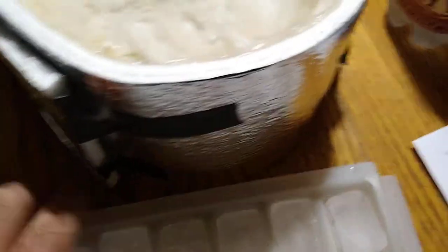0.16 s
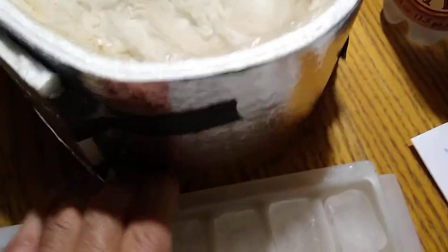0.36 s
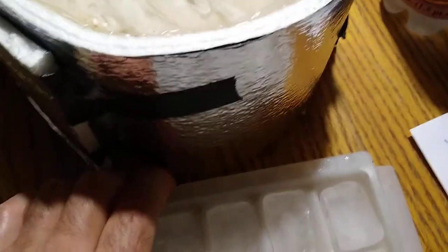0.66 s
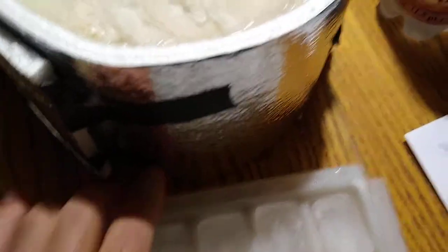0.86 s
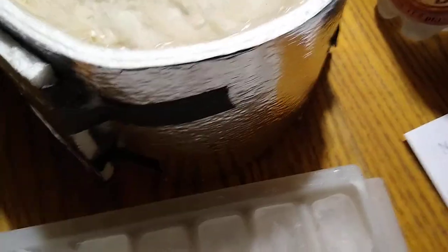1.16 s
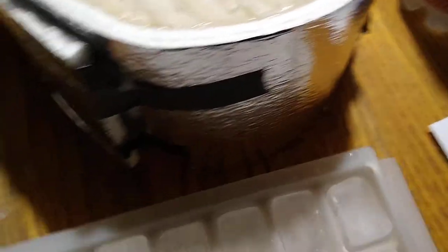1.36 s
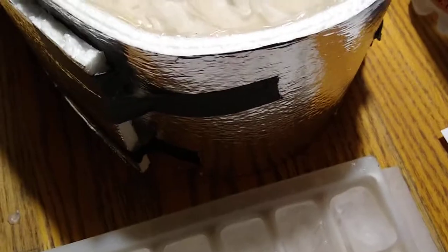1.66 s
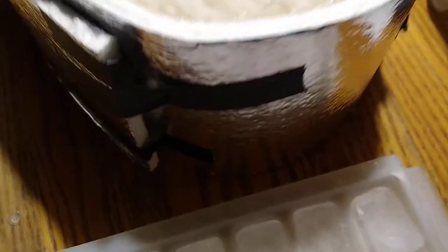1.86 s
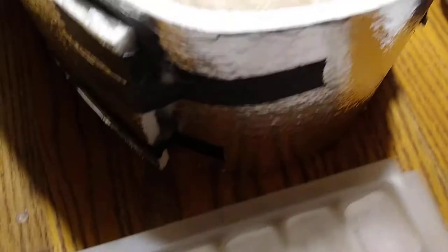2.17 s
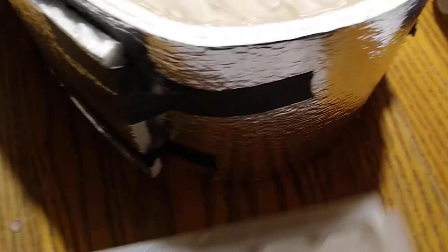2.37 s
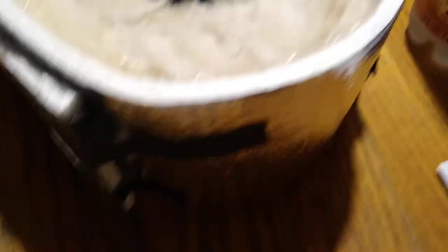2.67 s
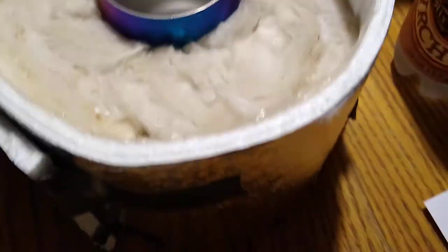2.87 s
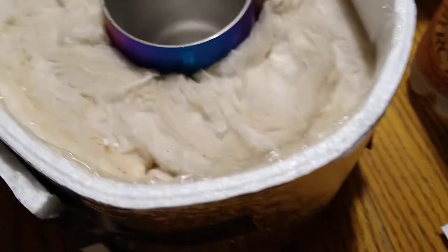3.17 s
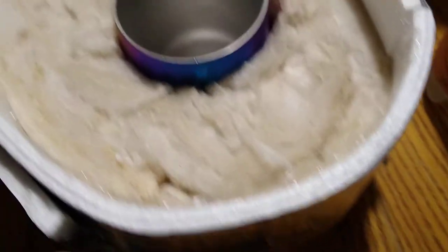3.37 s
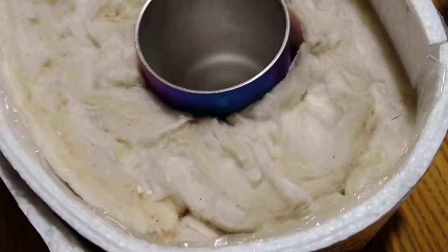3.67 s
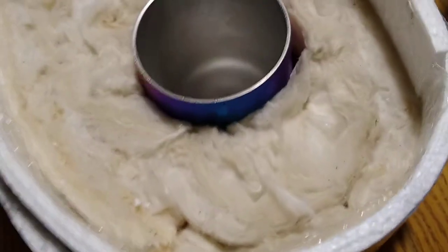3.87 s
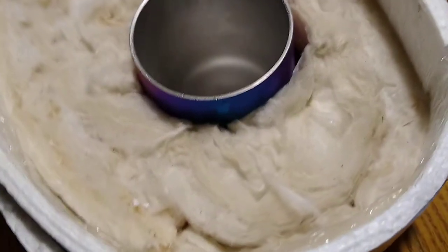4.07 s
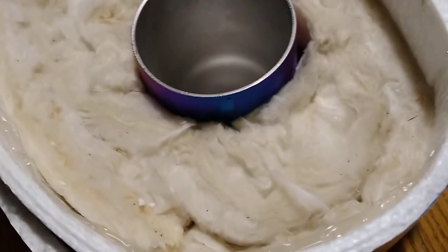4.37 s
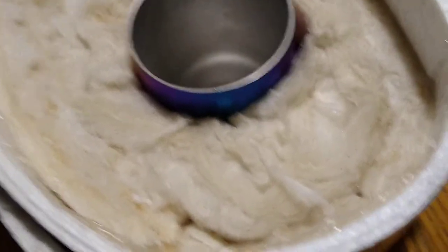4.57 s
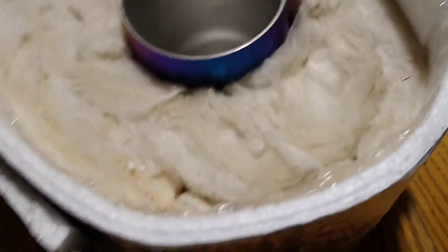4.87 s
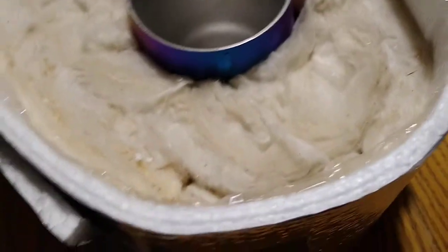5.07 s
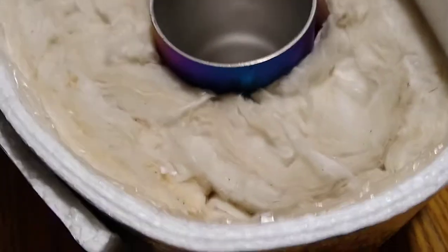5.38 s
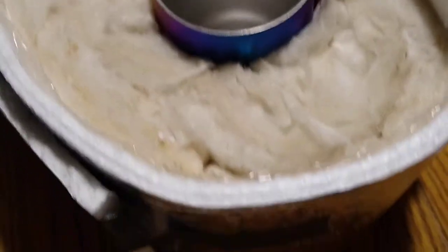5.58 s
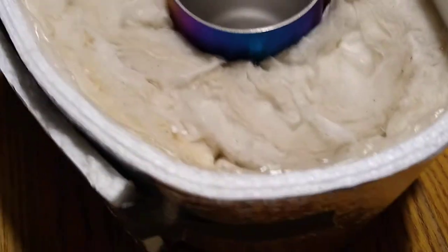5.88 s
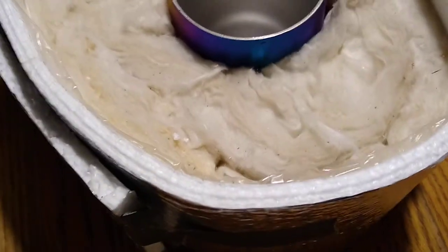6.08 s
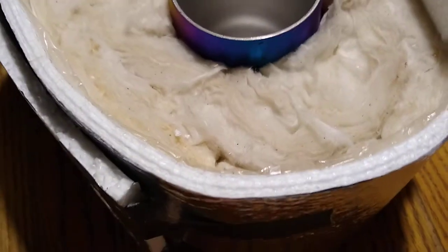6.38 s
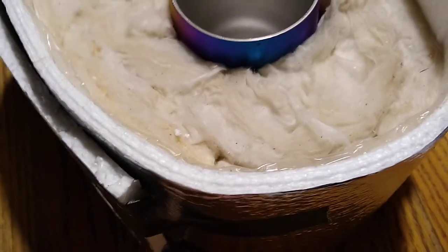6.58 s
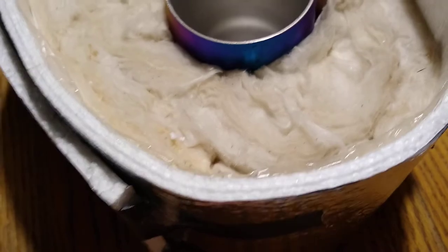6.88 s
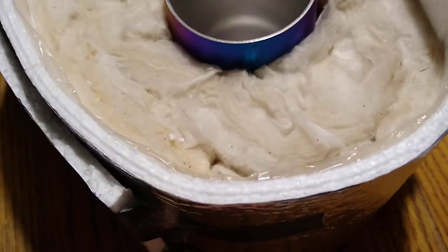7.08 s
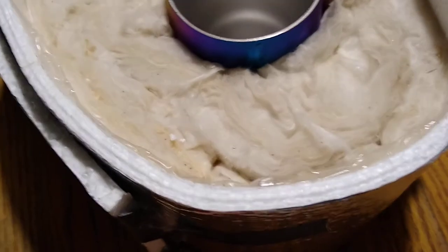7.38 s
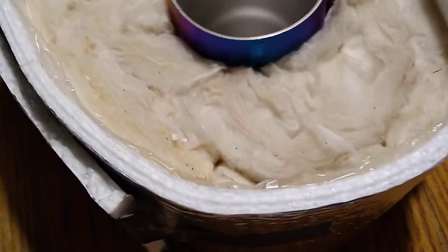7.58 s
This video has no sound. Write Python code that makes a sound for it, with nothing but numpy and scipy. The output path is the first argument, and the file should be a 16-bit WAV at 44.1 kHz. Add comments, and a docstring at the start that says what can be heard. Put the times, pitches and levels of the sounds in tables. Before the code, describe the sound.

Hand-held stereo microphones sit close to a tray of ice. Early knocks, finger rubs and a short crackle give way to near quiet, then a dragging rattle on wood. A heavy run of brittle cracks and bright snaps comes next, ending in clacks of loosened cubes. Later come isolated dull taps, soft hand rubbing and one final short creaking crackle, in a dry small room with faint low hush.

```python
"""A plastic ice cube tray, close to the two microphone ports of a hand-held camera: under strain its ice
cracks loose, each crack a snap amid tiny slips that set filtered, quickly dying noise ringing.
The tray knocks hollowly on a wooden table whose top booms, and loosened cubes clack in their cups.
Random ticks over smooth noise make the crackle of the twists, the drag, the fingers and the hands.
Behind it lie the faint answer of a small, quiet room and a steady hush of coloured noise."""
import sys
import numpy as np
from scipy import signal
from scipy.fft import rfft, irfft, next_fast_len
from scipy.io import wavfile

SR = 44100
rng = np.random.default_rng(int(sys.argv[2]) if len(sys.argv) > 2 else 0)


def store_pcm(level_fs):
    """Save levels as 16-bit WAV."""
    pcm = np.round(np.clip(level_fs, -1, 1) * 32767).astype(np.int16)
    wavfile.write(sys.argv[1], SR, np.atleast_2d(pcm).T)


N = 340442


def amp(db):
    """Decibels to gain."""
    return 10 ** (np.asarray(db) / 20)


def unit(x):
    """Scales to rms 1."""
    return x / np.sqrt(np.mean(x ** 2) + 1e-20)


def read(points, hz):
    """Reads a table on a logarithmic frequency axis."""
    f, value = np.transpose(points)
    return np.interp(np.log(hz + 1), np.log(f + 1), value)


def add(track, s, sound):
    """Mixes a sound into a two-channel track at time s."""
    part = track[:, max(round(s * SR), 0):][:, :sound.shape[1]]
    part += sound[:, :part.shape[1]]


def shaped(x, response):
    """Filters x by a gain given as a function of frequency."""
    size = next_fast_len(N + 8192)
    spectrum = rfft(x, size) * response(np.fft.rfftfreq(size, 1 / SR))
    return irfft(spectrum, size)[..., :N]


def coloured(x, colour):
    """Gives x a spectrum, at rms 1."""
    return unit(shaped(x, lambda hz: amp(read(colour, hz))))


def level(curve):
    """A dB curve as a gain on every sample, silent outside its span."""
    s, db = np.transpose(curve)
    return amp(np.interp(np.arange(N) / SR, s, db, left=-200, right=-200))


def swells(strokes, depth_db):
    """Each stroke grows by depth_db to its peak and dies away again."""
    total = 0
    for start, peak, end, db in strokes:
        edge_db = db - depth_db
        total = total + level([(start - .02, -120), (start, edge_db), (peak, db),
                               (end, edge_db), (end + .02, -120)])
    return total


def lift(hz, width, db):
    """A filter section that raises one resonance, or dips where db is negative."""
    damp, turn = np.pi * width / SR, -2 * np.cos(2 * np.pi * hz / SR)
    return np.array([[1 + damp * amp(db), turn, 1 - damp * amp(db), 1 + damp, turn, 1 - damp]]) / (1 + damp)


def spot(hz, width_hz=260, ring_db=8):
    """Every spot has its own ring, and two bright overtones that fall by chance."""
    overtones = [lift(f, 220, 7) for f in rng.uniform([2900, 3500], [3800, 6200])]
    return np.vstack([lift(hz, width_hz, ring_db)] + overtones)


# spectrum of the hush of the house: (frequency [Hz], density [dB per Hz, relative])
HUSH_COLOUR = [(25, -29.5), (105, -13.5), (170, -9.5), (206, -3.5), (245, -8.5), (450, -14.5), (1050, -14),
               (1550, -25.5), (2200, -33), (3400, -23), (4500, -35), (9000, -45), (16000, -38)]


def hush(level_db=-64.7, apart=0.93):
    """Quiet hush of the house: steady noise, partly shared by the ports and partly different."""
    shared = rng.standard_normal(N)
    return amp(level_db) * coloured(shared + apart * rng.standard_normal((2, N)), HUSH_COLOUR)


# the small room: (frequency [Hz], decay t60 [s], level [dB])
ROOM = [(100, 0.24, -8.5), (300, 0.14, -15), (1000, 0.42, -21.5), (3500, 0.24, -17.5), (7900, 0.16, -11.5),
        (14800, .26, -10.5)]


def room(x, dense_s=.05, late_db=-8):
    """Dense echoes that drop quickly after about 50 ms to a weaker tail, different at each port."""
    hz, t, echoes = signal.stft(rng.standard_normal((2, SR // 2)), SR, nperseg=256)
    table = np.array(ROOM)
    t60 = read(table[:, :2], hz)[:, None]
    db = read(table[:, ::2], hz)[:, None]
    echoes *= amp(db - 60 * t / t60)
    echoes *= np.sqrt(2 * np.log(1000) / (t60 * SR))  # equal energy whatever the decay
    echoes *= np.clip(t / 0.0025, 0, 1)  # nothing in the frame at time zero
    echoes *= amp(late_db * np.clip((t - dense_s) / .03, 0, 1))
    return signal.fftconvolve(x, signal.istft(echoes, SR, nperseg=256)[1], axes=1)[:, :N]


# the two microphone ports: (frequency [Hz], phase by which left leads [radians])
PORT_PHASE = [(100, -.7), (600, -.4), (1550, .2), (1850, 3), (2200, 3), (4350, -3.1), (4800, -3.5),
              (5400, -6.1), (6100, -6.9), (6500, -9.5), (8800, -16), (10400, -13.4), (15400, 0)]


def ports(x):
    """Sound bends round the camera and reaches its two ports at different phases."""
    halves = np.array([[.5j], [-.5j]])
    return shaped(x, lambda hz: np.exp(halves * np.interp(hz, *np.transpose(PORT_PHASE))))


# the two microphone ports: (frequency [Hz], left minus right [dB])
PORT_BALANCE = [(120, 5.5), (300, 3), (700, 1.5), (1700, -0.5), (2600, 1.5), (3900, -2.5), (6500, 2),
                (9500, 9), (12000, 11), (15500, 5)]


def balance(hz):
    """Gains of the two ports, at constant total power."""
    gains = amp(np.array([[.5], [-.5]]) * read(PORT_BALANCE, hz))
    return gains / np.sqrt(np.mean(gains ** 2, axis=0))


def friction(colour, slips_per_s, spread_db, smooth, count=4):
    """Stick and slip: random ticks of uneven size at several ringing spots, over a smooth hiss."""
    sizes = amp(spread_db * np.minimum(rng.exponential(size=N), 3)) * rng.choice([-1, 1], N)
    ticks = sizes * (rng.random(N) < slips_per_s / SR)
    where = rng.integers(count, size=N)
    rung = 0
    for k in range(count):
        rung = rung + signal.sosfilt(spot(rng.uniform(500, 1500)), ticks * (where == k) + 1e-18)
    return coloured(unit(rung) + smooth * rng.standard_normal(N), colour)


# spectrum of the rubbing hands: (frequency [Hz], density [dB per Hz, relative])
RUB_COLOUR = [(59, -37), (100, -12.5), (135, -2.5), (691, -12), (930, -10), (2080, -18.5), (3320, -16.5),
              (16000, -52)]
# soft rubs of the hands: (start [s], peak [s], end [s], level before the trim [dB])
RUBS = [(-.3, .5, 1.25, -57), (1.42, 1.53, 1.59, -55), (2.8, 3.5, 7.6, -60.5), (5.38, 5.52, 5.68, -58.5),
        (5.6, 5.75, 6.35, -62.5), (6.6, 7.3, 8, -59)]


def hand_rubs(trim_db=-1):
    """Soft rubs of the hands: sparse slips under as much smooth hiss."""
    rub = friction(RUB_COLOUR, slips_per_s=140, spread_db=3.5, smooth=1.0)
    return amp(trim_db) * rub * swells(RUBS, depth_db=16.5)


# spectrum of plastic on wood: (frequency [Hz], density [dB per Hz, relative])
DRAG_COLOUR = [(55, -60), (100, -21), (300, -13.5), (420, 0.5), (600, -5.5), (1300, -19), (2220, -26),
               (3600, -18.5), (4400, -20.5), (5800, -40), (7500, -45.5), (13200, -36), (16000, -45)]
# the tray dragging over the table: (time [s], level before the trim [dB])
DRAG = [(2.5, -55), (2.55, -47.5), (2.575, -37), (2.63, -42.5), (2.7, -35), (2.785, -34), (2.83, -46.5),
        (2.89, -41), (2.94, -61)]


def tray_drag(trim_db=-2):
    """The tray drags over the wood in dense slips."""
    drag = friction(DRAG_COLOUR, slips_per_s=650, spread_db=4, smooth=.25)
    return amp(trim_db) * drag * level(DRAG)


# spectrum of the rubbed or strained plastic: (frequency [Hz], density [dB per Hz, relative])
PLASTIC_COLOUR = [(88, -31), (150, -2.5), (270, 0.5), (504, -15), (1420, -18), (2180, -22), (3100, -14.5),
                  (4000, -11.5), (4410, -15.5), (5250, -16.5), (8400, -25.5), (15100, -17), (16000, -21.5)]
# strokes along the frosty plastic: (start [s], peak [s], end [s], level [dB])
# two rows end before they start; their points are interpolated unsorted
SLIDES = [(-.02, .012, 0.07, -43.5), (.4, .46, .6, -45), (.6, .66, 0.49, -44), (3.36, 3.4, 3.44, -44),
          (7.1, 7.14, 7.2, -50.5), (7.19, 7.28, 7.06, -33)]


def finger_slides():
    """Fingers slide along the frosty plastic in very dense, uneven slips."""
    slide = friction(PLASTIC_COLOUR, slips_per_s=900, spread_db=5.5, smooth=.25)
    return slide * swells(SLIDES, depth_db=20)


# each twist strains the tray and lets go: (start [s], peak [s], end [s], level before the trim [dB])
TWISTS = [(0.596, 0.663, 0.81, -42.5), (3.327, 3.55, 3.58, -51.5), (3.626, 3.752, 3.94, -39.5),
          (3.914, 4.142, 4.15, -48.5), (4.223, 4.355, 4.5, -54), (4.489, 4.625, 4.69, -46),
          (7.03, 7.236, 7.39, -46.5)]


def strain_crackle(trim_db=-1):
    """Fine crackle of the strained tray: sparse slips that swell with each twist."""
    strain = friction(PLASTIC_COLOUR, slips_per_s=140, spread_db=1.5, smooth=.15)
    return amp(trim_db) * strain * swells(TWISTS, depth_db=23.5)


# resonances of tray and table, and dips in the sound as picked up:
# (frequency [Hz], width [Hz], lift [dB])
MODES_AND_DIPS = [(143.2, 35, 11.5), (314.9, 34, 5.5), (490, 43, 2), (1120, 280, 3), (2216, 490, -13),
                  (3670, 320, 1), (5720, 1400, 5), (8130, 7100, -6.5)]


def tray_filter(low_hz, high_hz):
    """One register of the tray, with the resonances and dips in and next to it."""
    band = signal.butter(2, [low_hz, min(high_hz, .45 * SR)], "band", fs=SR, output="sos")
    skirt_hz = [.6 * low_hz, min(1.15 * high_hz, .47 * SR)]
    skirt = signal.butter(2, skirt_hz, "band", fs=SR, output="sos")
    modes = [lift(*mode) for mode in MODES_AND_DIPS if low_hz / 2 < mode[0] < high_hz * 2]
    return np.vstack([band, skirt] + modes)


# registers of the tray, thump to fizz: (low edge [Hz], high edge [Hz], ring t60 [s],
# ring against the first pulse, before ring_db [dB], span of the blow [s],
# ring that differs between the ports [ratio to the shared noise])
REGISTERS = [(120, 343, 0.19, -1, .035, 0.89), (270.6, 794, 0.09, 2.5, 0.028, 0.12),
             (720, 2345, 0.054, -0.5, 0.0095, 3.6), (2220, 4590, 0.039, 0, 0.036, 0.68),
             (6700, 18000, 0.012, 3, .012, 5.3)]


def strike(force, levels_db, ring_hz, filters, lead_s, ring_db):
    """A force sets each register going: a first pulse, then a dense, quickly dying ring from all over the tray."""
    t = np.arange(SR // 8) / SR
    out, own = np.zeros((2, len(t))), spot(ring_hz)
    for (_, _, t60, share_db, span, apart), sos, db in zip(REGISTERS, filters, levels_db):
        ring = rng.standard_normal(len(t)) + apart * rng.standard_normal((2, len(t)))
        ring *= amp(-60 * t / t60)
        ring *= amp(share_db + ring_db) / np.linalg.norm(ring[0])
        ring[:, 0] += 1  # the first pulse
        driven = signal.fftconvolve(force[None], ring, axes=1)[:, :len(t)]
        wave = signal.sosfilt(np.vstack([sos, own]), driven + 1e-18)
        # a level is the energy of the blow, spread over a hundredth of a second
        blow = np.linalg.norm(wave[:, :int((lead_s + span) * SR)])
        out += amp(db) * wave * np.sqrt(2 * SR / 100) / blow
    return out


def blow_force(lead, lead_in_db=-27, lead_in_s=0.0039):
    """The force of a blow: a few milliseconds of faint noise lead in to the full pulse."""
    force = rng.standard_normal(lead + 1) * np.exp(np.arange(-lead, 1) / (lead_in_s * SR))
    force *= amp(lead_in_db) / np.linalg.norm(force)
    force[lead] = 1
    return force


def boom(db, mode_hz=143.8, t60=.11, rise_s=0.01, boom_db=6, waver=0.034):
    """The lowest mode of the table top builds up over a cycle or two and dies away."""
    t = np.arange(SR // 4) / SR
    hz = mode_hz * (1 + waver * rng.uniform(-1.1, 1))
    wave = np.sin(2 * np.pi * hz * t) * (1 - np.exp(-t / rise_s))
    return np.ones((2, 1)) * wave * amp(db + boom_db - 60 * t / t60)


# the tray knocks on the table: (time [s], strength [dB], weight of the thump [dB],
# hardness of the contact [dB], ring of the struck spot [Hz])
KNOCKS = [(.167, -23, -13.5, -23.5, 596), (0.2127, -26.5, -3, -30, 720), (0.2255, -27, -33, -12.5, 396),
          (.236, -27.5, -3, -7, 640), (.243, -30, -9, -9.5, 1000), (0.6806, -22.5, -15.5, -17.5, 1130),
          (1.0093, -22.5, -23, -29, 1040), (1.0219, -26, -13, -20, 730), (1.033, -25, -10, -2.5, 1100),
          (1.4462, -39.5, -7, -10, 760), (1.9347, -49.5, -21, -13, 1040), (2.142, -40.5, -13, -23.5, 476),
          (2.507, -42.5, -11, -9.5, 640), (2.694, -30.5, -28, -29, 497), (2.7769, -32.5, -24, -20.5, 517),
          (2.7943, -34, -2, -28, 510), (2.89, -32.5, -5.5, -36, 504), (2.907, -35.5, 0.5, -43, 601),
          (3.0746, -46, -7.5, -7.5, 1050), (3.1789, -47, -3, -13, 1000), (3.3551, -38.5, 2, -2.5, 865),
          (4.651, -40.5, -2, -26, 657), (4.8202, -34.5, -0.5, -15, 315.4), (5.487, -38.5, -0.5, -20, 700),
          (5.5713, -25, -13, -13, 720), (6.0425, -32, 2.5, -12.5, 950), (6.626, -36, -21, -34.5, 1170),
          (6.6367, -42, -8, -3.5, 1254), (6.6852, -34.5, -3.5, -10.5, 800), (6.933, -39, -2, -23.5, 409),
          (7.3172, -30, -7.5, -7.5, 1460), (7.4674, -51.5, -18, -19, 1210), (7.5801, -31.5, -6, -21.5, 500),
          (7.6997, -29.5, -3, -7.5, 600)]


def knocks(filters, even_hz=950, hollow_db_per_octave=-10, fizz_db=-10):
    """Blunt blows of the tray on the table: the lower a spot rings, the hollower it sounds."""
    out, lead = np.zeros((2, N)), SR // 100
    for s, db, weight_db, hard_db, hz in KNOCKS:
        hollow_db = hollow_db_per_octave * np.log2(hz / even_hz)
        # hollow and body registers share the strength of the blow
        body_db = db - 10 * np.log10(1 + amp(hollow_db) ** 2)
        levels_db = [db + weight_db, body_db + hollow_db, body_db, db + hard_db, db + hard_db + fizz_db]
        blow = strike(blow_force(lead), levels_db, hz, filters, lead / SR, ring_db=-1)
        add(out, s - lead / SR, blow)
        add(out, s, boom(db + weight_db))
    return out


# loosened cubes clack back into their cups: (time [s], strength [dB], ring of the cup [Hz])
CLACKS = [(4.088, -20, 792), (4.123, -15.5, 899), (4.1672, -30.5, 810), (4.1762, -24, 827),
          (4.182, -31, 840.5)]
# what a cube puts into each register, thump to fizz: (level against its strength [dB])
CLACK_DB = [-21, -14, 0.5, -10, -23]


def clacks(filters, ring_db=-1):
    """A cube drops back and rings its cup."""
    out = np.zeros((2, N))
    for s, db, hz in CLACKS:
        add(out, s, strike(np.ones(1), db + np.array(CLACK_DB), hz, filters, 0, ring_db))
    return out


def cup_filters(filters, hz, lowest=0.68):
    """The middle register of a cracking cup holds little below the cup's own ring."""
    cut = signal.butter(3, min(lowest, 1) * hz, "high", fs=SR, output="sos")
    return filters[:2] + [np.vstack([filters[2], cut])] + filters[3:]


def crack_levels(db, bright_db, hz, hollow_db=-8, hollow_db_per_octave=-9, thump_db=-11,
                 fizz_db=-13, fizz_growth=.82, fizz_per_bright=0.25):
    """Levels of the registers: a low-ringing cup moves more of the tray; small, bright cracks hold more fizz."""
    body_db = db - bright_db
    low_db = body_db + hollow_db + hollow_db_per_octave * np.log2(hz / 900)
    top_db = fizz_db + fizz_growth * db + fizz_per_bright * bright_db
    return [low_db + thump_db, low_db, body_db, db, top_db]


def small_cracks(above_db=-1, spread_db=3, bright_db=9, scatter_s=.0012, count=3):
    """Every twist sets off a few faint cracks, most likely near its peak."""
    faint = []
    for start, peak, end, db in TWISTS:
        for _ in range(count):
            s = rng.triangular(*sorted([start, peak, end]))
            strength_db = db + above_db + spread_db * rng.uniform(-1, 1)
            faint.append((s, strength_db, bright_db, scatter_s, rng.uniform(620, 1300)))
    return faint


# the ice cracks loose: (time [s], strength before the trim [dB], brightness [dB],
# scatter of the slips, before a spread of 1.4 [s], ring of the cup [Hz])
CRACKS = [(.109, -37, 8, .0011, 890), (.3623, -45.5, 4.5, .0034, 720), (.4897, -46, -0.5, 0.0019, 656),
          (.6011, -37.5, -1, 0.0016, 1270), (.6094, -32.5, 3, .001, 1240), (.6342, -50, 5, .0015, 810),
          (.6518, -35.5, 5, 0.00071, 1390), (.6557, -29.5, 5, 0.0013, 1410),
          (.7223, -33.5, 4.5, 0.00077, 1030), (.8103, -27.5, 17.5, 0.00092, 1430),
          (.8259, -35.5, -1.5, 0.0014, 1370), (.8514, -54.5, -7.5, .002, 940),
          (3.4925, -44.5, 11, .0017, 820), (3.5684, -37.5, 9, .0011, 1020),
          (3.5851, -27, 13.5, 0.0016, 849), (3.5962, -19, 8, .0015, 855), (3.7403, -24, 8.5, 0.0033, 934),
          (3.7558, -22, 6, 0.0011, 720), (3.7603, -21.5, 6.5, 0.0018, 728),
          (3.7769, -21.5, 4.5, 0.0013, 870), (3.8178, -29, 7.5, .001, 1077),
          (3.8311, -24.5, 5.5, 0.0011, 1132), (3.8421, -20, -1, 0.00064, 1155),
          (3.9486, -19, -0.5, 0.00081, 826), (3.9523, -22.5, 2.5, 0.00096, 840),
          (3.9968, -22, 3, 0.00073, 1010), (4.0233, -34, 2.5, 0.00098, 711),
          (4.0845, -21.5, -1.5, 0.00062, 885.5), (4.0941, -22, 8.5, 0.0012, 816),
          (4.1141, -27, -4, 0.0018, 897), (4.1205, -25.5, -3, 0.00065, 898),
          (4.1467, -27.5, 5, 0.0033, 720), (4.2266, -44.5, 15.5, 0.00078, 610),
          (4.2711, -32.5, 13.5, 0.0005, 1355), (4.2851, -40.5, 10.5, 0.0027, 760),
          (4.3203, -46, 20, 0.00036, 930), (4.3303, -39, 25, 0.00051, 760), (4.3581, -46, 12, 0.0011, 710),
          (4.3922, -45, 24, 0.0015, 900), (4.4163, -47, 15, 0.00034, 740),
          (4.4344, -41.5, 3.5, 0.00098, 1230), (4.5017, -25.5, 12.5, .0007, 676),
          (4.5268, -42, 5, .0018, 850), (4.6324, -41, 5.5, .0015, 770), (5.0914, -48.5, 14.5, 0.00057, 780),
          (5.1613, -42, 10, 0.0015, 712), (5.2629, -47, 30, 0.00038, 810), (5.3275, -50.5, -4, .001, 833),
          (7.0132, -53, -2, .001, 1190), (7.0607, -43.5, -5.5, 0.0019, 1570),
          (7.1501, -25.5, -2.5, .0022, 1440), (7.2168, -42.5, -7, 0.00078, 1570),
          (7.2253, -38, 0, 0.0012, 1350), (7.2396, -28, 5.5, .0014, 1430), (7.2642, -38, -1.5, .0019, 1410),
          (7.2971, -35.5, -5, .0038, 1200), (7.4376, -57.5, 0.5, 0.00092, 1330),
          (7.5241, -54.5, -1, 0.0011, 1560)]


def cracks(filters, trim_db=0.19, before=0.51, slips=24):
    """One main snap amid a cluster of smaller slips, as a crack runs along the wall of a cup."""
    out, lead = np.zeros((2, N)), SR // 100
    for s, db, bright_db, scatter, hz in list(CRACKS) + small_cracks():
        force = np.zeros(2 * lead)
        delay = rng.laplace(size=slips) * 1.4 * scatter
        delay = np.maximum(delay, before * delay)  # slips ahead of the snap crowd closer to it
        at = np.clip(lead + SR * delay, 0, 2 * lead - 1).astype(int)
        force[at] = rng.standard_normal(size=slips) * np.sqrt(scatter / .045)
        force[lead] = 0  # leaves room for the main snap
        force[:lead + 1] += blow_force(lead, lead_in_db=-20, lead_in_s=0.0027)
        levels_db = crack_levels(db, bright_db, hz)
        snap = strike(force, levels_db, hz, cup_filters(filters, hz), lead / SR, ring_db=-4)
        add(out, s - lead / SR, snap)
    return amp(trim_db) * out


def scene():
    """The tray close to the ports, the room's faint answer, and the hush of the house."""
    filters = [tray_filter(low, high) for low, high, *_ in REGISTERS]
    handling = hand_rubs() + tray_drag() + finger_slides() + strain_crackle()
    tray = handling + knocks(filters) + clacks(filters) + cracks(filters)
    return shaped(ports(tray) + room(tray), balance) + hush()


def record(dry, edge_hz=15900):
    """Full-scale limit, then the band limit."""
    low_pass = signal.firwin(255, edge_hz, window=("kaiser", 8), fs=SR)
    return signal.oaconvolve(np.clip(dry, -1, 1), low_pass[None], "same", axes=1)


dry = scene()
out = record(dry)
store_pcm(out)
```